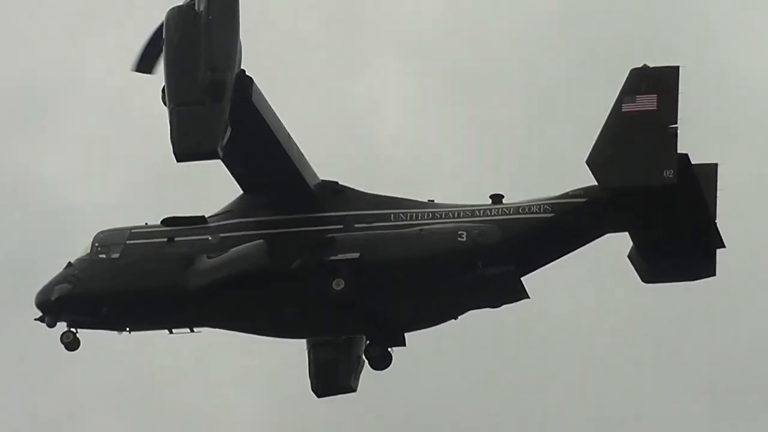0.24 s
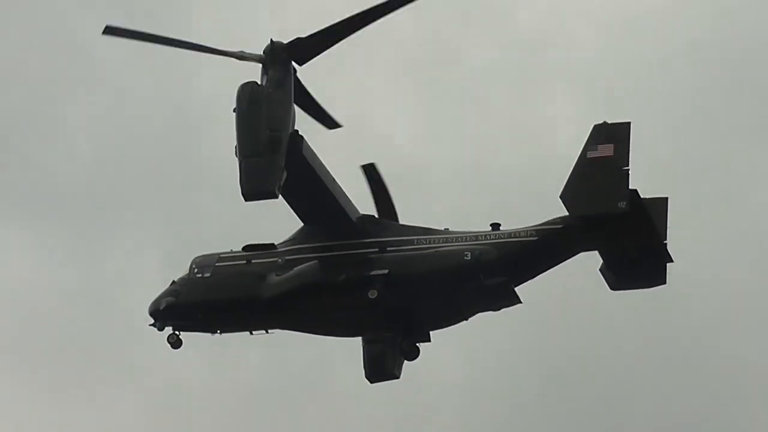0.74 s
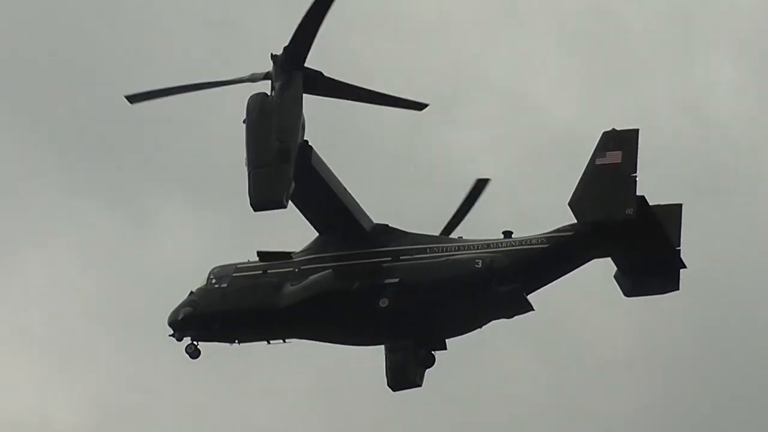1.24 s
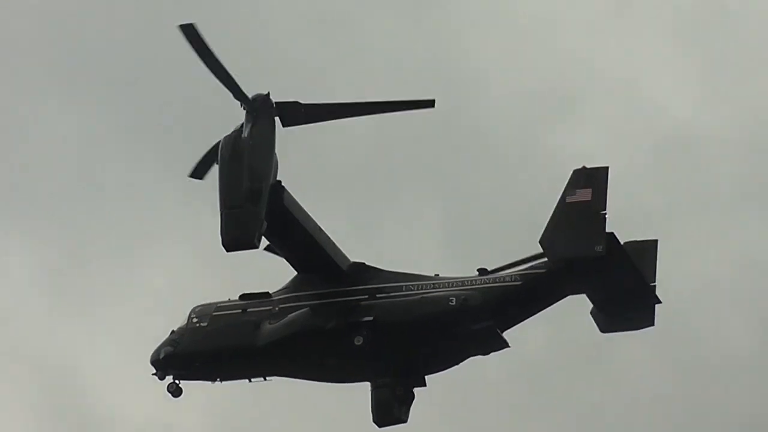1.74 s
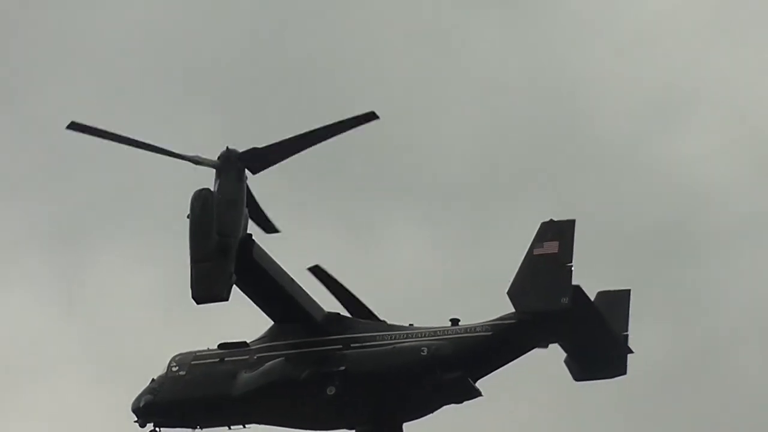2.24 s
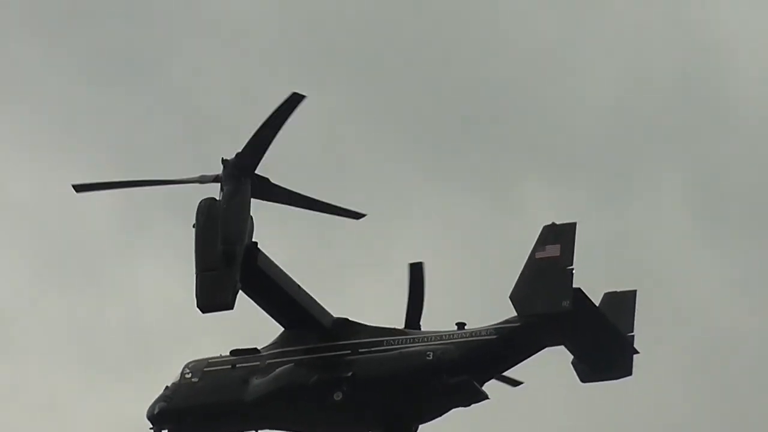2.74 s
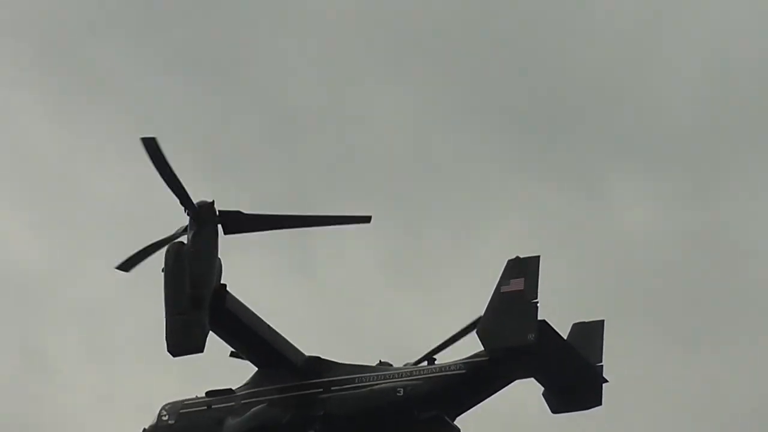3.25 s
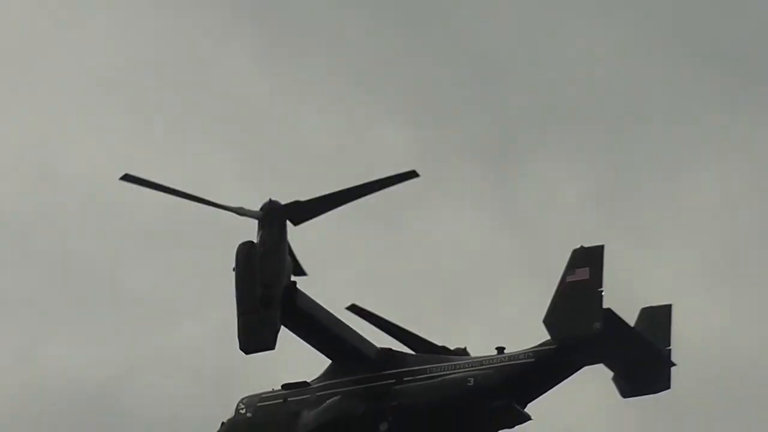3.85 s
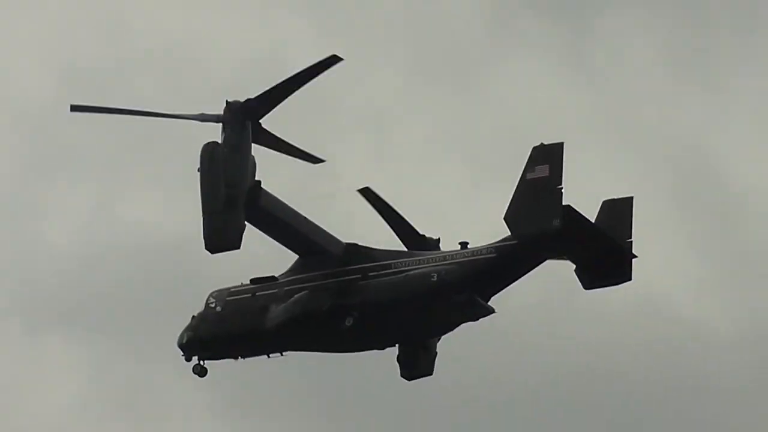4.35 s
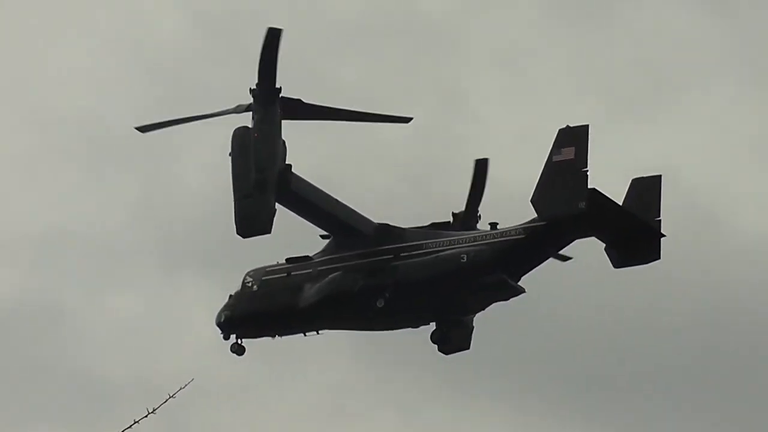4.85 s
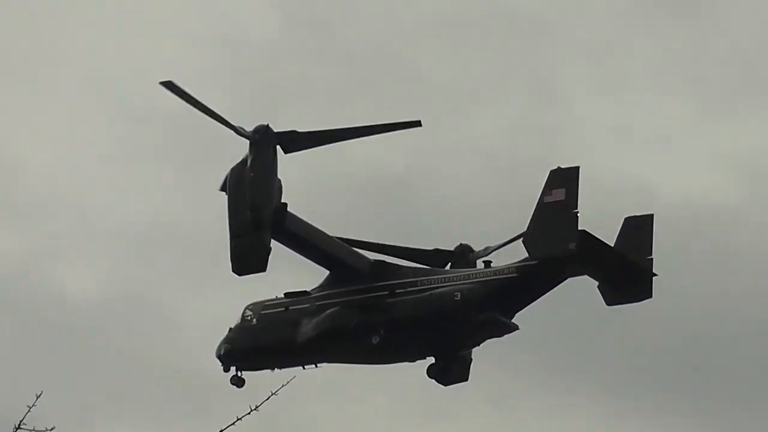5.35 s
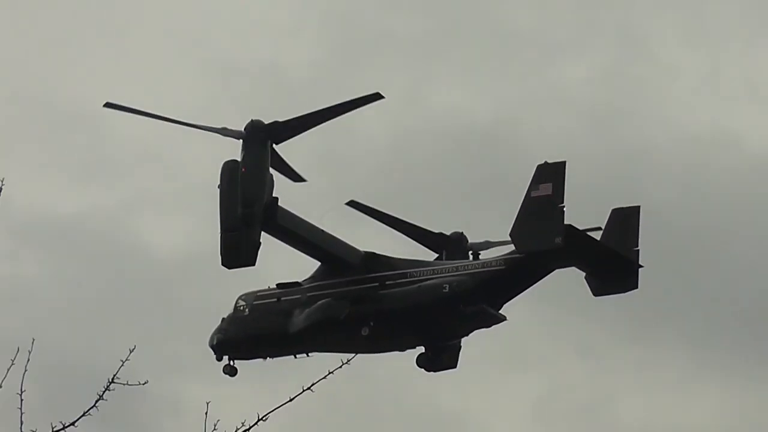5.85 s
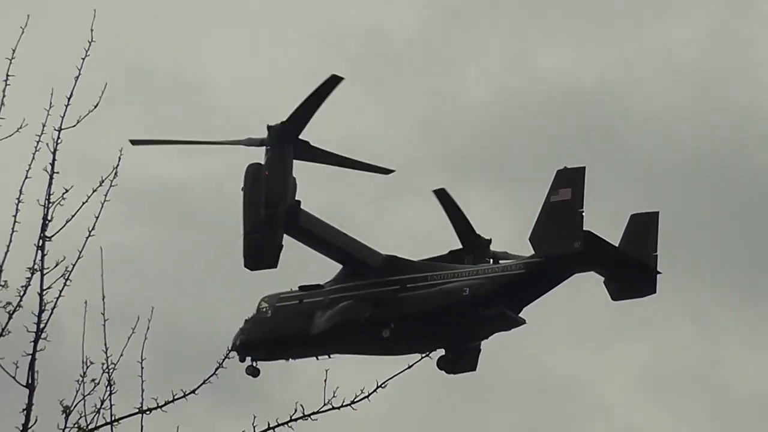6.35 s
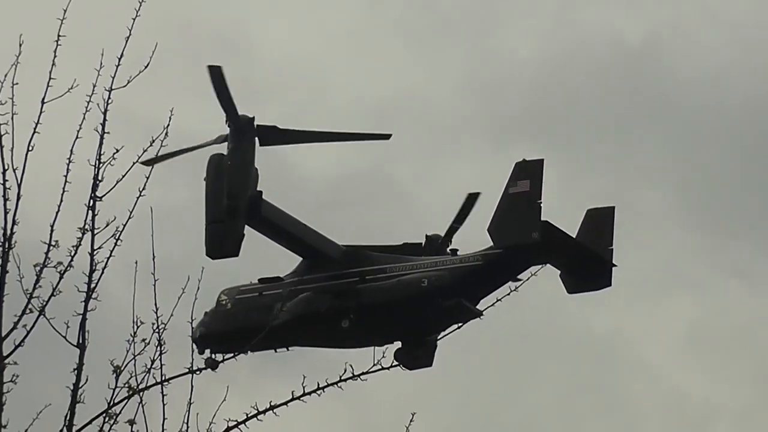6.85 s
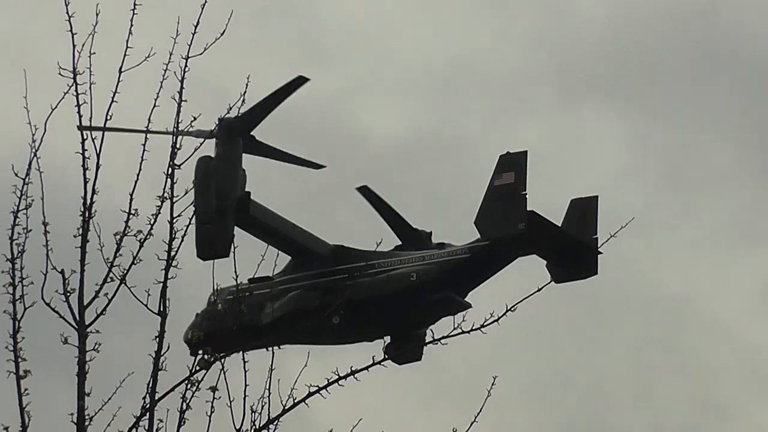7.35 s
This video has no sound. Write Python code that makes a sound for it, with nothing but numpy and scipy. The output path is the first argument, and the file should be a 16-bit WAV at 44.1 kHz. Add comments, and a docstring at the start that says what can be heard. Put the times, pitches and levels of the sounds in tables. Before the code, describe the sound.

From the start a tiltrotor is already close and loud, passing low outdoors: a thick rushing whoosh with strong mid roar and airy turbine hiss, throbbing about twenty times a second. Dull, hollow blade slaps and steep dry cracks stand out unevenly, clustered in the first 0.8 s, sparser until about 1.5 s. From 2.0 to 2.25 s a short rough, fluttering surge swells in the roar and stops quickly. Slaps thicken from 2.8 s, and a low wavering hum rises and sinks underneath. From about 4.3 s the chopping becomes nearly continuous, with crackling snaps around 4.7 to 5.1 s. After 5.2 s roar and hiss weaken as the aircraft draws away, yet the slaps stay heavy, strongest near 6.3 s, continuing to the end at 7.6 s. Short echoes from ground and a house front colour it; the small stereo microphone clips peaks and the sound drifts slightly left.

```python
"""Blade slaps and sharp cracks ride on a throbbing whoosh: a tiltrotor with its rotors turned up crosses
low over a city street and slowly draws away. Slaps are short rows of pressure swings, cracks are single
spikes with crackle; the whoosh is banded noise that throbs at the blade rate, from thump up to turbine hiss.
Under them lie a brief rough surge and a low blade hum of sine tones; a house front and the ground send
echoes, and a small microphone clips the highest peaks."""
import sys
import numpy as np
from scipy import signal
from scipy.fft import irfft, next_fast_len
from scipy.io import wavfile
from scipy.ndimage import uniform_filter1d

SR = 44100
rng = np.random.default_rng(int(sys.argv[2]) if len(sys.argv) > 2 else 0)


def store_pcm(level_fs):
    """Save levels as 16-bit WAV."""
    pcm = np.round(np.clip(level_fs, -1, 1) * 32767).astype(np.int16)
    wavfile.write(sys.argv[1], SR, np.atleast_2d(pcm).T)


N = 335160
BLADE_HZ = 20.28
PAD = 4096  # spare samples at each end of a track of short sounds

# How the blade beat wanders. Each row: time in seconds, lag in blade periods, throb of the swish in dB
# (the hiss takes a share of it).
BLADE_BEAT = [(0, 0.41, 1.5), (.6, 0.42, 0.2), (1, 0.13, 1.5), (1.8, 0.016, 1), (2.6, -0.034, 2),
              (3.4, 0.043, 2.5), (3.8, -.12, 2), (5, -0.021, 3.5), (6.2, -0.018, 5), (7.6, -0.065, 4)]


def slaps():
    """A blade cuts a short row of vortices: a few pressure swings with sharper crests than troughs."""
    # Each row: time of the highest crest in seconds, peak in dB before the 6.5 dB trim, pitch in Hz.
    loud_slaps = [(0.032, -5, 240), (0.1136, -10, 257), (0.165, -4.5, 247), (0.3182, -4.5, 262),
                  (0.373, -2.5, 216), (0.414, -7, 260), (0.4739, 0, 232), (0.514, -1.5, 247),
                  (0.5684, -0.5, 235), (0.6238, -6, 288), (0.7199, -6, 253), (0.7716, -8, 261),
                  (0.813, -11, 279), (0.9505, -3, 231), (1.135, -10, 267), (1.5289, -0.5, 269),
                  (1.5732, -5, 277), (1.6313, -7, 250), (1.68, -2, 255), (1.877, -10, 271),
                  (1.943, -5, 290), (1.9791, 0.5, 290), (2.1273, -5, 300), (2.2247, -3.5, 249),
                  (2.328, -2, 268), (2.423, 1, 223), (2.462, -2.5, 211), (2.6102, -13, 245),
                  (2.658, -5, 215), (2.811, 1.5, 255), (2.8589, 3.5, 273), (2.956, -3.5, 302),
                  (3.016, -3, 240), (3.261, 0, 241), (3.3125, -1.5, 220), (3.3599, 4, 220),
                  (3.4099, -1.5, 226), (3.4545, -3, 249), (3.5151, -5, 233), (3.645, -3, 246),
                  (3.828, -7, 259), (3.898, -2, 248), (3.9885, -2.5, 269), (4.0284, -2, 274),
                  (4.191, -2, 300), (4.295, 2, 258), (4.3402, 2, 228), (4.3856, -1.5, 248),
                  (4.4364, -5, 266), (4.489, -5, 253), (4.534, 0, 250), (4.5883, 0, 288), (4.6375, -2, 264),
                  (4.685, -0.5, 265), (4.7854, -6, 249), (4.8312, -7, 259), (4.886, -2, 304),
                  (4.9315, -1, 285), (4.982, 0.5, 287), (5.079, 3, 268), (5.1289, 3.5, 264),
                  (5.175, -2, 255), (5.2252, -1, 270), (5.275, -1, 277), (5.326, -8, 281), (5.374, -4, 292),
                  (5.425, -2.5, 310), (5.541, -5, 274), (5.5951, -6, 284), (5.647, -5, 333),
                  (5.7211, -0.5, 260), (5.7673, -0.5, 250), (5.8171, -1, 305), (5.8644, -1.5, 267),
                  (5.9137, 1, 256), (5.9638, 2.5, 260), (6.0176, 3, 241), (6.0666, 1.5, 233),
                  (6.1156, -5, 243), (6.1655, -5.5, 275), (6.2188, -3.5, 318), (6.262, -1.5, 322),
                  (6.311, 6.5, 275), (6.36, -1, 280), (6.4132, 0, 283), (6.4627, 1, 280), (6.5078, 4, 270),
                  (6.556, 2, 267), (6.6118, -1, 253), (6.7532, 5, 250), (6.899, -1, 274), (6.9488, 3, 278),
                  (6.9985, 2.5, 270), (7.053, 0.5, 267), (7.099, 0, 274), (7.147, 1, 292),
                  (7.2448, -2, 282), (7.2934, 4, 330), (7.344, -1.5, 294), (7.3963, 2, 316),
                  (7.4427, -3, 283), (7.493, -3, 284), (7.543, -0.5, 280), (7.592, 1, 270)]
    loud = np.array(loud_slaps, float)
    # the quieter slaps fall on the blade beat wherever no loud one does, and grow by 1 dB per s
    s, chance = beats_between(loud)
    small_db = np.minimum(-12.5 + 1.0 * s + 2.8 * chance[1], -5)
    small_hz = 265 * (1 + 0.1 * chance[2])
    small = np.column_stack([s + 0.0013 * chance[0], small_db, small_hz])
    first = np.vstack([loud, small])

    # a weaker vortex cut trails each slap by about 21 ms
    chance = rng.standard_normal((len(first), 3)).T
    trail_s = first[:, 0] + np.clip(.021 + .005 * chance[0], .006, .04)
    trail_db = first[:, 1] - 11.5 + 3.5 * chance[1]
    trail_hz = first[:, 2] * (1.147 + 0.18 * chance[2])
    trail = np.column_stack([trail_s, trail_db, trail_hz])

    t = np.arange(-2048, 2048) / SR
    env = np.where(t < 0, np.exp(-(t / 0.0043) ** 2), np.exp(-(np.abs(t) / 0.0052) ** 1.5))
    track = np.zeros(N + 2 * PAD)
    for s, db, hz in np.vstack([first, trail]):
        turn = 2 * np.pi * hz * t
        # the octave, strongest at the middle, sharpens the crests
        crest = .28 * env * np.cos(2 * turn + 1.16 * rng.standard_normal())
        add(track, s, undb(db - 6.5) * env * (np.cos(turn) + crest))
    return band(track, 90, 4000)[PAD:PAD + N]


def cracks():
    """A close vortex cut: one steep pressure spike in a short spray of crackle, with a tick and a puff of hiss."""
    # Each row: time in seconds, peak in dB and tick in dB, both before the filters and trims below.
    loud_cracks = [(0.071, -12, -54), (0.17, -11, -54), (0.216, -18, -51), (0.266, 7, -43), (0.316, 4, -50),
                   (0.4155, 4, -47), (0.753, 3, -66), (0.9453, 4.5, -70), (1.7307, 4, -43), (2.164, 4, -70),
                   (2.227, 8.5, -54), (2.808, -5, -70), (2.8578, 2, -50), (2.9089, -3, -58),
                   (3.054, -6, -53), (3.1563, 8.5, -70), (3.7356, 7.5, -49), (3.829, 2, -68),
                   (4.024, -1, -61), (4.1887, -4, -60), (4.279, 5.5, -56), (4.4893, -15, -54),
                   (4.5387, 3, -48), (4.687, 9, -42), (4.731, 7, -87), (4.980, 8, -46), (4.984, 4, -50),
                   (5.029, 0, -50), (5.076, 5, -40), (5.128, -3, -53), (5.475, -0.5, -67), (5.7677, 4, -52),
                   (5.9654, 1, -60), (6.016, 1, -49), (6.0652, 3, -48), (6.164, 2.5, -68),
                   (6.2128, 1.5, -70), (6.2588, -16, -62), (6.407, 4.5, -47.5), (6.555, 3.5, -49),
                   (6.9472, -13, -55), (6.998, -3, -49), (7.049, -2, -52), (7.1455, 0, -61),
                   (7.2938, -10, -60), (7.391, -4, -54), (7.542, -8, -57)]
    # the quieter cracks fall on the free blade beats and fade by 0.7 dB per s
    s, chance = beats_between(np.array(loud_cracks))
    small_s = s - .002 + 0.0031 * chance[0]
    small_db = -16 - 0.7 * s + 2.5 * chance[1]
    small_tick_db = -67 + 5 * chance[2]
    small = np.column_stack([small_s, small_db, small_tick_db])

    t = np.arange(-512, 512) / SR
    spike = (1 - (t / 0.00036) ** 2) * np.exp(-(t / 0.00024) ** 2 / 2)
    spray = np.exp(np.where(t < 0, t / 0.0014, -t / 0.004))
    tick_env, puff_env = np.exp(-np.abs(t) / 0.003), np.exp(-(t / 0.0052) ** 2)
    body, tick, puff = np.zeros((3, N + 2 * PAD))
    for s, db, tick_db in np.vstack([loud_cracks, small]):
        noise = rng.standard_normal(len(t))
        grains = np.repeat(rng.exponential(size=32), 32)  # uneven steps make the tick crackle
        add(body, s, undb(db) * (.7 * spike + 0.19 * spray * noise))
        add(tick, s, undb(tick_db) * tick_env * noise * grains)
        add(puff, s, undb(tick_db + 11) * puff_env * noise[::-1])

    # the body is filtered forwards, then backwards
    body = band(band(body, 250, 2260)[::-1], 180, 2260)[::-1]
    tick = band(tick, 2500, 12000)
    out = band(puff, 3000, 6100) + undb(-5.0) * body + undb(-5.0) * tick
    return out[PAD:PAD + N]


def whoosh():
    """Third-octave bands of noise: the low ones throb with the thump, the high ones with the hiss."""
    # Noise as heard while the aircraft draws away. Each row: time in seconds, then the level of thump, body,
    # roar, rasp and hiss in dB before the make-up gain.
    zone_levels = [(0.0, -21.5, -24.5, -17.5, -23, -39), (0.24, -20, -27.5, -21.5, -25.5, -40),
                   (0.48, -23.5, -21, -24.5, -27.5, -42), (0.71, -19.5, -28.5, -20, -29, -45),
                   (0.95, -21.5, -26, -19.5, -27, -42.0), (1.19, -24.0, -26.5, -21, -27, -41.0),
                   (1.42, -23.5, -23, -19, -26.5, -40.5), (1.66, -21.5, -26.5, -18, -27, -40.0),
                   (1.9, -21, -24.5, -20.5, -25, -41), (2.14, -20, -27.5, -22, -30, -41),
                   (2.38, -20, -30, -23.5, -28, -43), (2.58, -23.5, -24, -25.5, -27, -40),
                   (2.76, -20, -25, -22, -26.5, -38), (2.85, -19.5, -26.0, -23.5, -28, -40),
                   (3.09, -19, -23, -23.0, -28, -42), (3.32, -16, -27, -26.5, -27.5, -42.5),
                   (3.56, -21, -25, -23.0, -28.5, -43.5), (3.8, -23, -22.5, -23.5, -28.5, -43),
                   (4.04, -21.5, -22.5, -22, -28.5, -43), (4.27, -20, -24.5, -22.0, -29.5, -43.5),
                   (4.51, -21.5, -23.5, -24.5, -30, -46.5), (4.75, -19, -24.5, -23.5, -30, -45.5),
                   (4.99, -20.5, -19.5, -23.5, -28.5, -46.5), (5.22, -18, -24.5, -30.5, -32.5, -48.5),
                   (5.46, -21, -22.5, -25, -30.5, -45.5), (5.7, -16.5, -20, -30, -32, -48),
                   (5.94, -22.5, -25, -24, -30.5, -48), (6.18, -20, -26, -28.5, -33.5, -47.5),
                   (6.41, -19.5, -20.5, -30.5, -32, -50.5), (6.65, -25, -31, -31, -37, -54),
                   (6.89, -19.5, -24, -31, -35.5, -52.5), (7.12, -17.5, -29.5, -31, -34.5, -51.5),
                   (7.36, -19, -24.5, -29.5, -34.5, -51.5), (7.6, -18, -25, -29, -33.5, -50)]
    # Centres of thump, body, roar, rasp and hiss in Hz.
    zone_centres = [230, 450, 780, 1400, 5000]
    # Whoosh and turbine noise about the level of each zone. Each row: frequency in Hz, level in dB per Hz.
    air_tone = [(30, -48.5), (60, -28.5), (125, -18), (170, -4.5), (240, -1.5), (400, -3), (620, -5.5),
                (760, -1), (900, -5), (1150, -7), (1500, -8.5), (2200, -13.5), (2800, -21), (4600, -12.5),
                (6500, -18), (10000, -36), (12500, -44.5), (15500, -74)]
    # Stereo picture. Each row: frequency in Hz, left minus right in dB, unrelated part in dB at the start,
    # its drift in dB per second.
    stereo = [(30, -1, -12, 0), (60, -5, -9, 1), (125, -4, -11, -1), (250, -2.5, -17, -0.47),
              (500, -1.8, -15, 0.36), (800, 0.5, -18.5, 0.8), (1500, -0.5, -14, 0.76),
              (4000, -1.5, -14.5, 1), (8000, -1.5, -20, 0), (12000, -1, -16.5, 1.5)]
    # The wake repeats from blade to blade. Each row: frequency in Hz, share carried over (0-1).
    wake_repeat = [(60, 0.02), (185, 0.48), (260, 0.72), (400, 0.34), (700, 0.17)]
    # Where the noise sits: the centres of thump and roar wander unevenly. Each row: time in seconds,
    # thump in Hz, roar in Hz.
    wandering_centres = [(0.0, 244, 924), (0.67, 250, 770), (1.08, 226, 730), (1.18, 268, 746),
                         (2.69, 244, 750), (2.88, 260, 740), (3.53, 224, 716), (3.6, 261, 720),
                         (4.8, 251, 770), (4.87, 302, 745), (5.04, 255, 680), (5.21, 272, 780),
                         (5.69, 277, 706), (6.1, 235, 702), (6.24, 288, 750), (6.67, 253, 750),
                         (7.37, 295, 686), (7.6, 268, 753)]
    usual_hz, repeat_hz = (255, 750), 20.22  # usual thump and roar; rate of the wake

    zones_db = curves(zone_levels)
    lag, throb_db = curves(BLADE_BEAT)
    thump, thump_size = throb(lag, 0.18, 0.71)
    swish, swish_size = throb(lag - 0.061, 0.4, 2.13)
    gust = walk(6.3)
    thump_shift, roar_shift = (np.log(c / usual) for c, usual in zip(curves(wandering_centres), usual_hz))
    size = next_fast_len(N)
    hz = np.maximum(np.arange(size // 2 + 1) * SR / size, 1)
    # each blade meets much the same wake as the last, which gathers the low noise on multiples of the rate
    share = np.clip(at_hz(wake_repeat, hz), 0, .9)
    comb = np.sqrt(1 - share ** 2) / np.abs(1 - share * np.exp(2j * np.pi * hz / repeat_hz))

    out = np.zeros((2, N))
    for centre in 25 * 2 ** (np.arange(29) / 3):
        # one band of random-phase noise, as a middle and an unrelated side
        shape = np.cos(np.pi / 2 * np.clip(3 * np.log2(hz / centre), -1, 1)) * undb(at_hz(air_tone, hz))
        used = np.flatnonzero(shape > 1e-9)
        spec = np.zeros((2, len(hz)), complex)
        spec[:, used] = (shape * comb)[used] * np.exp(2j * np.pi * rng.random((2, len(used))))
        mid, side = irfft(spec, size)[:, :N] * np.sqrt(size)

        # level blended from the two nearest zones
        place = np.interp(np.log(centre), np.log(zone_centres), np.arange(5))
        db = sum(max(1 - abs(place - k), 0) * zone for k, zone in enumerate(zones_db))
        # slide the tone curve with the thump (reach -1) or the roar (reach 1)
        reach = np.interp(np.log(centre), np.log([80, 140, 420, 600, 1300, 2000]), [0, -1, -1, 1, 1, 0])
        shift = max(-reach, 0) * thump_shift + max(reach, 0) * roar_shift
        db = db + at_hz(air_tone, centre / np.exp(shift)) - at_hz(air_tone, centre)

        # throb: shares of the band that lie above the thump and in the hiss
        up = np.clip(np.log2(centre / 330), 0, 1)
        top = np.clip(np.log2(centre / 1900) * 2.7, 0, 1)
        low_throb = drift(2, 0.17) * thump + 0.56 * thump_size
        depth_db = np.abs(throb_db) * (1 - top + top * 0.69)
        high_throb = depth_db * (swish + 0.2 * swish_size) + 0.77 * swish_size
        db = db + (1 - up) * low_throb + up * high_throb

        # unsteadiness: gusts shared by all bands, then slow and fast patches of this band alone
        patches = 1.1 * up * (1 - top) * walk(6)
        flutter = (0.5 + 0.74 * up - 0.46 * top) * walk(12)
        db = db + 0.2 * gust + patches + flutter

        side = side * undb(drift(at_hz(stereo, centre, order=2), at_hz(stereo, centre, order=3)))
        lean = at_hz(stereo, centre) / 2
        out += undb(db) * np.array([undb(lean) * (mid + side), undb(-lean) * (mid - side)])
    return out * undb(22.5)  # make-up gain


def surge():
    """A short swell of fluttering mid noise that stops quickly."""
    # A rough surge in the roar: start and end in seconds, low and high edge in Hz, middle level in dB.
    rough_surge = (2.0, 2.24, 900, 1750, -24.5)
    start, end, lo_hz, hi_hz, db = rough_surge
    env = np.interp(np.arange(N) / SR, [start - .04, start, end - .02, end + .03], [0, 1, 1, 0])
    noise = band(band(rng.standard_normal(N), lo_hz, hi_hz), lo_hz, hi_hz)
    return undb(db + 4.1 * walk(38.5)) * env * noise / noise.std()


def hum():
    """Low multiples of the blade rate, as sine tones that swell and sink as the two rotors beat."""
    # Each row: frequency in Hz, level in dB above its curve, which of the level curves it follows.
    hum_tones = [(40.7, 0, 0), (61, 0, 1), (81.4, 0, 2), (101.2, -13, 3), (121.7, -9, 3), (141.5, -10, 3),
                 (161.5, -6, 3), (182.5, -7, 3)]
    # Each row: time in seconds, then the curve in dB of the second, third and fourth multiple, and the one
    # the higher multiples share.
    hum_curves = [(0.0, -52, -60, -47, -30), (0.49, -48, -50, -49, -37), (1.25, -46, -43, -49, -32.5),
                  (1.31, -43, -41, -35, -30), (1.46, -44, -54, -53, -29.5), (1.67, -43, -40, -41, -30),
                  (2.31, -51, -62, -44, -38), (2.56, -50, -42, -50, -34), (2.64, -47, -47, -43, -25),
                  (2.94, -46, -38, -41, -31.5), (3.3, -58, -50, -41, -27), (3.51, -59, -40, -53, -29),
                  (3.62, -50, -49, -36, -23), (3.81, -52, -38, -40, -24.5), (4.13, -51, -37, -52, -25),
                  (4.4, -63, -51, -37, -28.5), (4.64, -58, -46, -43.5, -25.5), (5.84, -53, -44.5, -31, -27),
                  (6.96, -69, -57.5, -41, -30), (7.6, -63, -49, -42, -34)]
    waver_db, waver_per_s, slip_rad, lead_rad = 1.6, 5, 1.1, 0.21
    t = np.arange(N) / SR
    levels_db = curves(hum_curves)
    out = np.zeros((2, N))
    for hz, db, column in hum_tones:
        higher = column == 3  # the higher multiples waver twice as much and slip in phase
        level_db = db + levels_db[column] + waver_db * (1 + higher) * walk(waver_per_s)
        slip = slip_rad * higher * walk(waver_per_s)
        lead = lead_rad * rng.standard_normal() * np.array([[.5], [-.5]])  # left against right
        out += np.sqrt(2) * undb(level_db) * np.sin(2 * np.pi * (hz * t + rng.random()) + slip + lead)
    return out


def house_front(beats):
    """A house front to one side returns the slaps 19 ms later, faint and opposite in the two channels."""
    return np.roll(beats, int(0.019 * SR)) * undb(-26.5) * np.array([[1], [-1]])


def dip(x):
    """A hollow between thump and roar that fills as the aircraft draws away."""
    centre_hz, width_hz = 506, 110
    share = np.clip(drift(0.55, -0.086), 0, 1)
    return x - share * signal.lfilter(*signal.iirpeak(centre_hz, centre_hz / width_hz, fs=SR), x)


def ground(x):
    """Direct sound plus a duller echo whose delay shrinks as the aircraft sinks towards the skyline."""
    delay_ms, strength = drift(4.643, -0.19), drift(0.23, -0.031)
    place = np.arange(N) - delay_ms * SR / 1000
    echo = np.array([np.interp(place, np.arange(N), c) for c in x])
    echo = signal.sosfilt(signal.butter(1, 2500, fs=SR, output="sos"), echo)
    return (x + np.clip(strength, 0, 1) * echo) / np.sqrt(1 + strength ** 2)


def throb(lag, rise, sharp):
    """Swell (-1 to 1) as each blade sweeps towards the listener, rising over a share of the period; its random size."""
    turns = BLADE_HZ * np.arange(N) / SR - lag + rise
    size = rng.standard_normal(int(BLADE_HZ * N / SR) + 4)[np.floor(turns).astype(int) + 1]
    part = turns % 1
    ramp = np.where(part < rise, part / rise, (1 - part) / (1 - rise))
    peak = np.sin(np.pi / 2 * ramp) ** (2 * sharp)
    return 2 * peak - 1, size * peak


def beats_between(loud):
    """Times of the blade beat wherever no loud event lies, with three chance values each."""
    s = np.arange(1, int(BLADE_HZ * N / SR)) / BLADE_HZ
    s = s + curves(BLADE_BEAT)[0][(s * SR).astype(int)] / BLADE_HZ
    free = np.abs(s[:, None] - loud[:, 0]).min(axis=1) > .015
    return s[free], rng.standard_normal((len(s), 3))[free].T


def add(track, s, shape):
    """Lay a short sound on a padded track with its middle at s."""
    i = int(s * SR) + PAD - len(shape) // 2
    track[i:i + len(shape)] += shape


def undb(db):
    """Decibels to an amplitude factor."""
    return 10 ** (np.asarray(db) / 20)


def curves(table):
    """Columns of a table after its times, one value a sample."""
    s, *columns = np.transpose(table)
    return [np.interp(np.arange(N) / SR, s, c) for c in columns]


def at_hz(table, hz, order=1):
    """One column of a table, read between its rows on a logarithmic frequency scale."""
    rows = np.array(table, float)
    return np.interp(np.log(hz), np.log(rows[:, 0]), rows[:, order])


def drift(start, per_s):
    """A value that changes steadily, one a sample."""
    return start + per_s * np.arange(N) / SR


def walk(rate):
    """Random levels held 1 / rate s and smoothed twice; spread near 1."""
    k = int(SR / rate)
    held = np.repeat(rng.standard_normal(N // k + 1), k)
    return 1.18 * uniform_filter1d(uniform_filter1d(held, k), k)[:N]


def band(x, lo_hz, hi_hz):
    """Keep what lies between two frequencies."""
    edges = [lo_hz, min(hi_hz, .45 * SR)]
    return signal.sosfilt(signal.butter(2, edges, "bandpass", fs=SR, output="sos"), x)


def scene():
    """Whoosh, surge and slaps pass the ground echo, the hum joins, and the whole leans slowly to the left."""
    beats = slaps() + cracks()
    air = ground(dip(whoosh()) + surge() + beats + house_front(beats))
    air = air + hum() * undb([[-1.2], [1.2]])
    pan_db = drift(0.3, 0.14)  # left minus right
    return air * undb(np.array([pan_db, -pan_db]) / 2)


def record(dry):
    """The small microphone clips at full scale, and a steep low-pass cuts the top above 15.7 kHz."""
    return signal.sosfilt(signal.ellip(8, .2, 70, 15700, fs=SR, output="sos"), np.clip(dry, -1, 1))


dry = scene()
out = record(dry)
store_pcm(out)
```